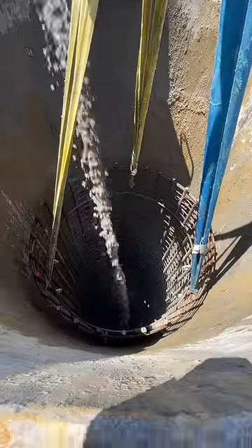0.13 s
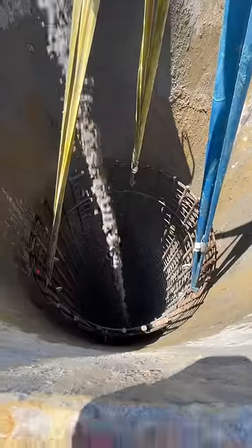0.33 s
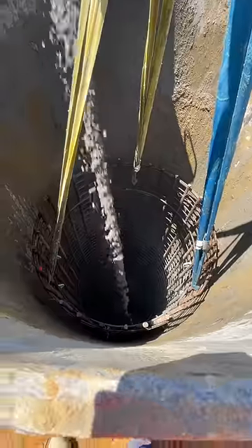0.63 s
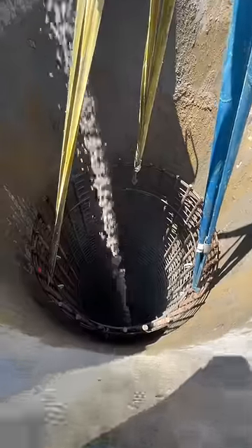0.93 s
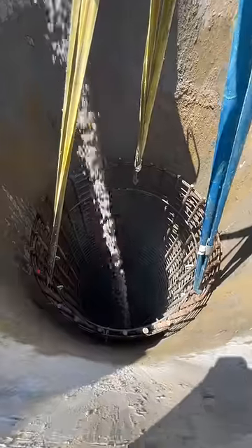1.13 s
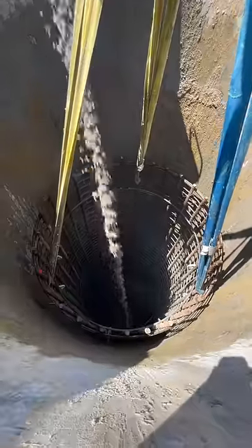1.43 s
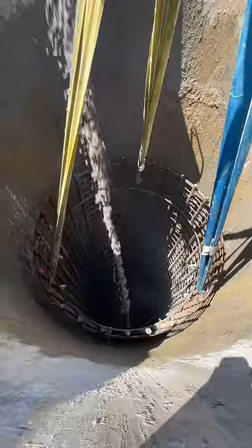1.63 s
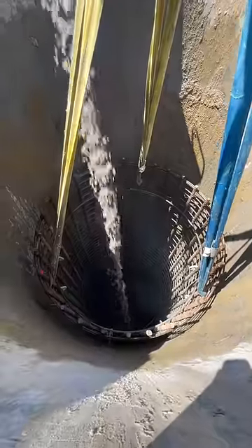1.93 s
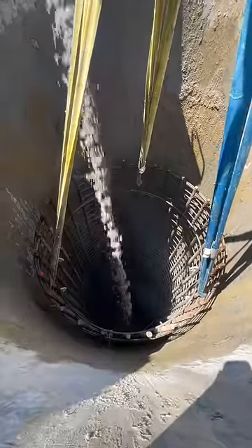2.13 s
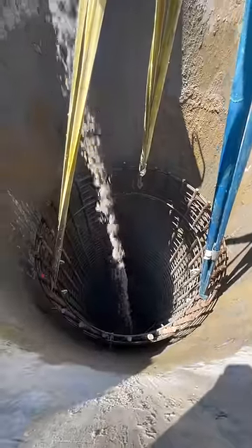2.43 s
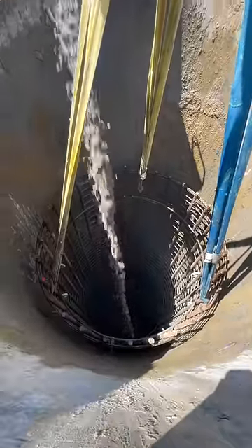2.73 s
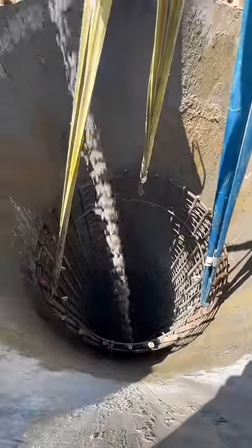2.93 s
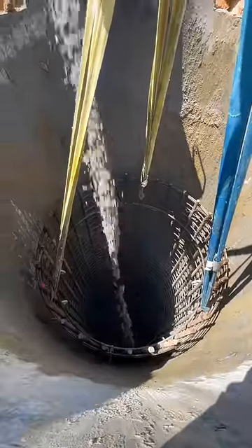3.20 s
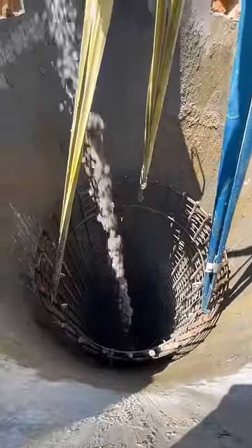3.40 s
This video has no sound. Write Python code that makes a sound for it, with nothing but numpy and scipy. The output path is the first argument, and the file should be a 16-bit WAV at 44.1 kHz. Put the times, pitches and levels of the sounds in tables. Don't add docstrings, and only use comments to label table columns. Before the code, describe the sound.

Steady gritty splatter of falling wet concrete, with dull booms from deep in a shaft.

```python
import sys
import numpy as np
from scipy import signal
from scipy.fft import rfft, irfft, next_fast_len
from scipy.io import wavfile

SR = 44100
rng = np.random.default_rng(int(sys.argv[2]) if len(sys.argv) > 2 else 0)


def invert_db(level):
    return 10 ** (np.asarray(level, dtype=float) / 20)


def int16_out(signal):
    q = np.round(np.clip(np.atleast_2d(signal).T, -1, 1) * 32767)
    wavfile.write(sys.argv[1], SR, q.astype(np.int16))


N = 156996
TIME_S = np.arange(N) / SR


def rms_one(x):
    return x / np.sqrt(np.mean(x ** 2) + 1e-20)


def at_hz(points, hz):
    table_hz, value = np.transpose(points)
    return np.interp(np.log(hz), np.log(table_hz), value)


def over_time(points):
    start_s, *columns = np.transpose(points)
    return [np.interp(TIME_S, start_s, column) for column in columns]


def bins_hz(size):
    return np.maximum(np.arange(size // 2 + 1) * SR / size, 1)


def drift(rate_hz):
    r = np.exp(-80 * np.pi * rate_hz / SR)
    noise = rng.standard_normal(N // 40 + 2002)
    slow = rms_one(signal.lfilter([1], [1, -2 * r, r * r], noise)[2000:])
    return np.interp(np.arange(N) / 40, np.arange(len(slow)), slow)


def banded(pair, spectrum, centres_hz, swing_db):
    size = next_fast_len(N)
    hz = bins_hz(size)
    coloured = rfft(pair, size) * invert_db(at_hz(spectrum, hz))
    out = 0
    for k, centre_hz in enumerate(centres_hz):
        share = np.interp(np.log(hz), np.log(centres_hz), np.arange(len(centres_hz)) == k)
        band = irfft(coloured * share, size)[:, :N]
        out = out + invert_db(swing_db(centre_hz)) * band
    return rms_one(out)


# start_s, spray_db, cage_graze_db
STREAM = [(0.102, -28.5, 4.5), (0.241, -24, 2), (0.4, -29, 2), (.7, -28.5, 5), (.82, -26.5, 3),
          (1.0, -27.5, 0), (1.3, -26, 0.5), (1.46, -28, 1.5), (1.799, -26, 0.5), (2.037, -30.5, 1.5),
          (2.259, -24.5, 1.5), (2.42, -27.5, 0), (2.72, -26, 1), (2.85, -29, 2), (3.14, -26.5, -1),
          (3.32, -27, 1), (3.499, -31.5, 3.5), (3.56, -23, 4.5)]
# freq_hz, density_db_per_hz
SPATTER_COLOUR = [(300, -12), (850, -1.5), (1700, -3), (2600, -2), (3150, -4), (4200, -3.5), (5500, -2.5),
                  (8000, -5.5), (12000, -15.5), (13000, -18), (15500, -23)]
# freq_hz, follow_db_per_db
STREAM_FOLLOWING = [(500, -0.35), (1200, .5), (3000, 0.54), (5600, 0.61), (9000, 0.7)]
STONES_PER_S, STONE_SPREAD_DB, STONE_DB, BUNCH_DB = 9000, 3.0, -2, 2.0
CAGE_HZ, CAGE_WIDTH_HZ, CAGE_GAIN = 2530, 880, 0.33
SPATTER_DB, SHARED_SWING_DB, BAND_SWING_DB = 6, 0.33, 1.14


def spatter():
    stream_db, graze_db = over_time(STREAM)
    mean_db = stream_db.mean()
    size_db = STONE_SPREAD_DB * np.minimum(rng.exponential(1, (2, N)), 4)
    stones = invert_db(size_db) * rng.choice([-1, 1], (2, N))
    stone_rate = STONES_PER_S * invert_db(stream_db - mean_db + BUNCH_DB * drift(40.0))
    hits = rng.random((2, N)) < stone_rate / SR
    spray = rng.standard_normal((2, N))
    impacts = spray + invert_db(STONE_DB) * rms_one(stones * hits)

    r = np.exp(-np.pi * CAGE_WIDTH_HZ / SR)
    poles = [1, -2 * r * np.cos(2 * np.pi * CAGE_HZ / SR), r * r]
    ring = signal.lfilter([(1 - r * r) / 2, 0, (r * r - 1) / 2], poles, impacts)
    impacts = impacts + CAGE_GAIN * invert_db(2 * graze_db) * ring

    common_db = stream_db - mean_db + SHARED_SWING_DB * drift(6.2)

    def swing_db(hz):
        return at_hz(STREAM_FOLLOWING, hz) * common_db + BAND_SWING_DB * drift(15.7)

    centres_hz = 250 * 2 ** np.arange(0, 6.5, .5)
    return invert_db(mean_db + SPATTER_DB) * banded(impacts, SPATTER_COLOUR, centres_hz, swing_db)


# centre_s, pitch_hz, level_db
BLOB_SMACKS = [(.02, 1065, -27), (.03, 2800, -29), (.197, 3750, -29), (.215, 2820, -29), (.242, 2440, -31),
               (.242, 5800, -34), (0.273, 3920, -29), (.299, 990, -32), (.505, 2630, -36),
               (.606, 3060, -28), (.614, 555, -31), (.706, 2280, -30), (.801, 3550, -31), (.855, 1140, -33),
               (.963, 3550, -27), (1.108, 1330, -30), (1.287, 4950, -28), (1.374, 5300, -30),
               (1.624, 5800, -31), (1.724, 3750, -32), (1.783, 2070, -31), (2.09, 2200, -23),
               (2.13, 1930, -31), (2.163, 2480, -28), (2.168, 2040, -24), (2.24, 1900, -27),
               (2.272, 4900, -24), (2.33, 1710, -29), (2.412, 905, -27.5), (2.574, 1230, -28),
               (2.686, 2040, -26), (2.69, 1720, -31), (2.744, 5000, -32), (2.775, 2420, -29),
               (3.14, 4550, -33), (3.254, 2600, -29), (3.357, 4900, -33), (3.544, 1970, -25)]
BLOB_S, BLOB_GLIDE_PER_S, BLOB_ROUGH, BLOB_SCATTER, BLOB_TRIM_DB = 0.0072, 0.5, 1.8, 0.8, -6.5


def blobs():
    out = np.zeros(N)
    for centre_s, pitch_hz, level_db in BLOB_SMACKS:
        first = max(int((centre_s - 4 * BLOB_S) * SR), 0)
        near = slice(first, int((centre_s + 4 * BLOB_S) * SR))
        t = TIME_S[near] - centre_s
        bell = np.exp(-.5 * (t / BLOB_S) ** 2)
        chirp = np.sin(2 * np.pi * pitch_hz * t * (1 + BLOB_GLIDE_PER_S * t))
        out[near] += invert_db(level_db + BLOB_TRIM_DB) * bell * chirp
    rough = out * (1 + BLOB_ROUGH * drift(120.0))
    return rough * np.array([[1], [BLOB_SCATTER]])


SPLATS_PER_S, SPLAT_LOW_HZ, SPLAT_HIGH_HZ, SPLAT_PITCHES = 150, 781, 3740, 14
SPLAT_CYCLES, SPLAT_DB = 10.2, -38.5


def splats():
    _, graze_db = over_time(STREAM)
    rate = SPLATS_PER_S * invert_db(2 * graze_db + 5.0 * drift(12.0))
    hits = rng.random((2, N)) < rate / SR
    clicks = hits * invert_db(3.6 * np.minimum(rng.exponential(1, (2, N)), 3))
    dealt = rng.integers(0, SPLAT_PITCHES, (2, N))
    out = 0
    for k, hz in enumerate(np.geomspace(SPLAT_LOW_HZ, SPLAT_HIGH_HZ, SPLAT_PITCHES)):
        r = invert_db(-60 * hz / SPLAT_CYCLES / SR)
        poles = [1, -2 * r * np.cos(2 * np.pi * hz / SR), r * r]
        swell = signal.lfilter([1 - r], poles, clicks * (dealt == k) + 1e-18)
        out = out + signal.lfilter([1 - r, 0, r - 1], poles, swell)
    return invert_db(SPLAT_DB) * rms_one(out)


# start_s, level_db, pitch_hz
CLUMP_LANDINGS = [(.0, -41, 58), (.18, -40, 70), (.6, -44.5, 255), (.73, -42, 55), (1.04, -45, 243.6),
                  (1.27, -46, 249), (1.45, -40, 55), (1.58, -46, 160), (1.81, -42, 60.7),
                  (1.84, -42.5, 251), (2.15, -43, 69.4), (2.81, -45, 188), (2.89, -46, 247),
                  (3.21, -45, 255), (.58, -37, 55), (0.578, -40, 139), (.58, -45, 100), (1.2, -45, 66),
                  (1.401, -48, 141), (1.579, -39, 79), (1.841, -43, 148), (2.76, -43, 173),
                  (2.97, -40, 135), (3.06, -40, 127), (3.29, -39.5, 112), (3.289, -40, 158),
                  (3.43, -42, 239)]
BOOM_RISE_S, BOOM_GLIDE_PER_S, BOOM_ROUGH, BOOM_TRIM_DB = 0.019, 0.73, 0.14, 4.5


def booms():
    out = np.zeros(N)
    for start_s, level_db, pitch_hz in CLUMP_LANDINGS:
        t = np.maximum(TIME_S - start_s, 0)
        swell = t / BOOM_RISE_S * np.exp(1 - t / BOOM_RISE_S)
        tone = np.sin(2 * np.pi * pitch_hz * t * (1 + BOOM_GLIDE_PER_S * t))
        out += invert_db(level_db + BOOM_TRIM_DB) * swell * tone
    return out * (1 + BOOM_ROUGH * drift(38.0))


# freq_hz, density_db_per_hz
ROAR_COLOUR = [(25, -31), (45, 6.5), (65, 4.5), (115, 7.5), (170, -0.5), (260, -2), (400, -6.5), (700, -16)]
# start_s, swell_db, brighten_db_per_octave
ROAR_SWELL = [(0, 1.5, 2), (.3, -1.5, -2.5), (.55, 0.5, -0.5), (.9, 0, 0), (1.3, 2, 0), (1.7, 2, -1),
              (2.0, -0.5, .5), (2.4, -1, 1.5), (2.7, -1, 2.5), (2.95, -1, 3), (3.1, 0, 1), (3.3, 1.5, 1),
              (3.56, -2, 1)]
ROAR_DB, TILT_PIVOT_HZ, ROAR_SWING_DB = -37.5, 120, 1.1


def roar():
    swell_db, tilt_db = over_time(ROAR_SWELL)

    def swing_db(hz):
        return swell_db + tilt_db * np.log2(hz / TILT_PIVOT_HZ) + ROAR_SWING_DB * drift(3.7)

    centres_hz = 30 * 2 ** np.arange(0, 5.5, .5)
    white = rng.standard_normal((2, N))
    return invert_db(ROAR_DB) * banded(white, ROAR_COLOUR, centres_hz, swing_db)


# freq_hz, level_db
RIGHT_SHADE = [(60, .5), (200, 3), (340, 4), (520, -3.5), (870, -11.5), (1300, -5), (2700, -1.3), (3300, 0)]
# freq_hz, likeness_0_to_1
PORT_LIKENESS = [(90, .68), (260, .96), (430, .8), (600, .35), (850, .1), (1150, .7), (1700, .68),
                 (2020, .33)]
# freq_hz, added_likeness
PRESENCE_GAIN = [(2020, 0), (2650, .32), (3100, .1), (3450, .22), (3880, -.14), (4200, .13), (4950, .14),
                 (5400, .35)]
# freq_hz, added_likeness
TREBLE_GAIN = [(5500, 0), (6400, -.08), (6950, 0.34), (7900, 0.3), (8300, 0.1), (8900, 0), (10800, 0.27),
               (12000, .2), (13000, .17), (15500, .185)]
# freq_hz, lead_rad
RIGHT_LEAD = [(80, .25), (260, -.2), (600, -1.7), (800, -1.1), (960, 1.4), (1750, .95), (2300, 2.35),
              (3500, 2.8), (4000, 4.7), (5300, 5.4)]
LAG_FROM_HZ, PORT_LAG_S = 5300, .00015


def ports(direct, scattered):
    size = next_fast_len(N + 4096)
    hz = bins_hz(size)
    likeness = at_hz(PORT_LIKENESS, hz) + at_hz(PRESENCE_GAIN, hz) + at_hz(TREBLE_GAIN, hz)
    alike = np.clip(likeness, 0, 1)
    lag_rad = 2 * np.pi * PORT_LAG_S * np.maximum(hz - LAG_FROM_HZ, 0)
    turned = np.exp(1j * (at_hz(RIGHT_LEAD, hz) - lag_rad)) * rfft(direct, size)
    right = alike * turned + np.sqrt(1 - alike ** 2) * rfft(scattered, size)
    shaded = right * invert_db(at_hz(RIGHT_SHADE, hz))
    return np.array([direct, irfft(shaded, size)[:N]])


# start_s, left_shade_db
HAND_SHADE = [
    (0, -0.4),
    (.8, -1.1),
    (1.0, 0),
    (3.0, 0.1),
    (3.3, -0.1),
]


def scene():
    direct_booms = booms() * [[1], [0]]
    direct, scattered = spatter() + blobs() + splats() + direct_booms + roar()
    left, right = ports(direct, scattered)
    shade_db, = over_time(HAND_SHADE)
    return np.array([left * invert_db(shade_db), right])


def top_cut(x):
    return signal.sosfilt(signal.butter(12, 15740, fs=SR, output="sos"), x)


def record(dry):
    bass_cut = signal.butter(2, 49, "high", fs=SR, output="sos")
    mix = signal.sosfilt(bass_cut, dry)
    return top_cut(mix)


dry = scene()
out = record(dry)
int16_out(out)
```